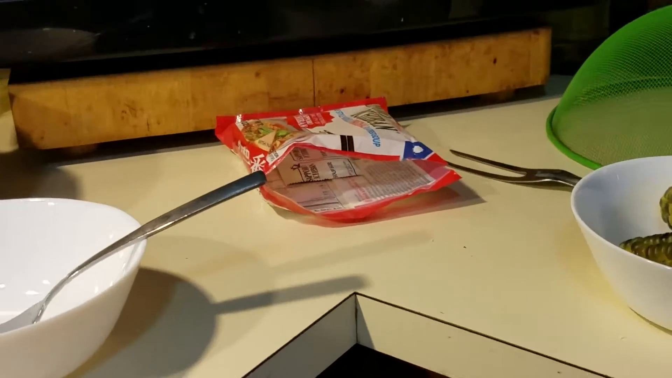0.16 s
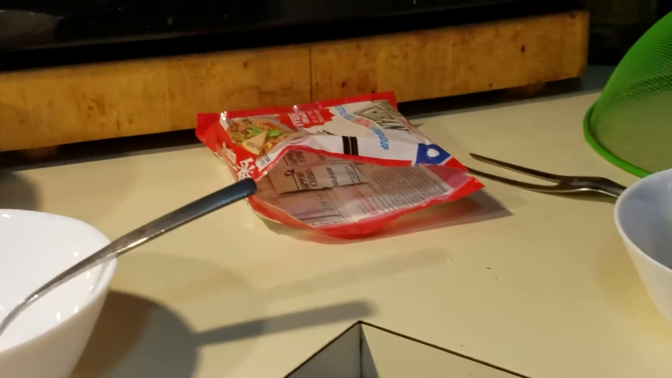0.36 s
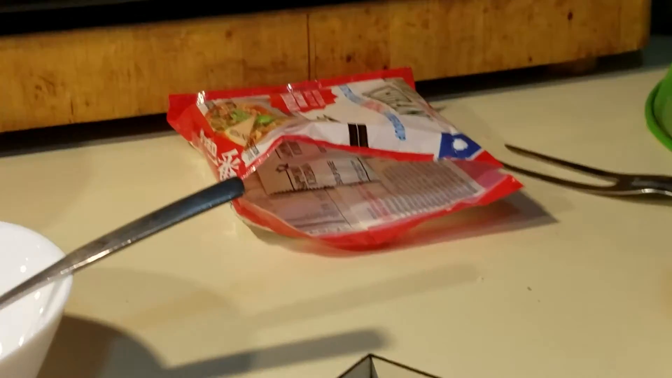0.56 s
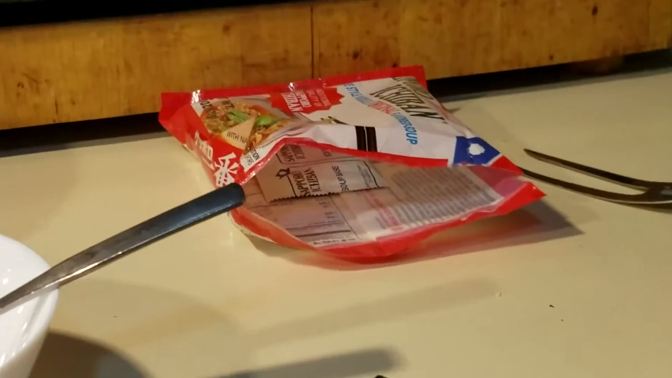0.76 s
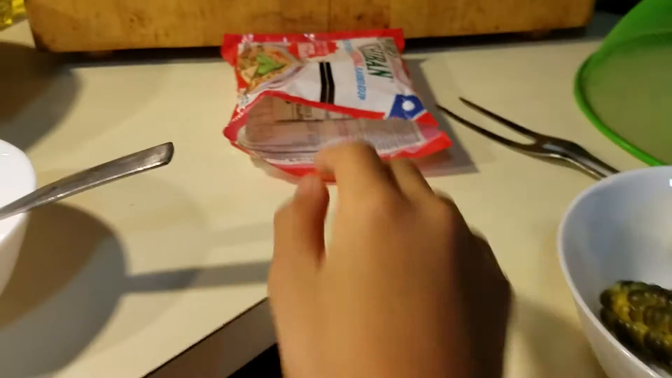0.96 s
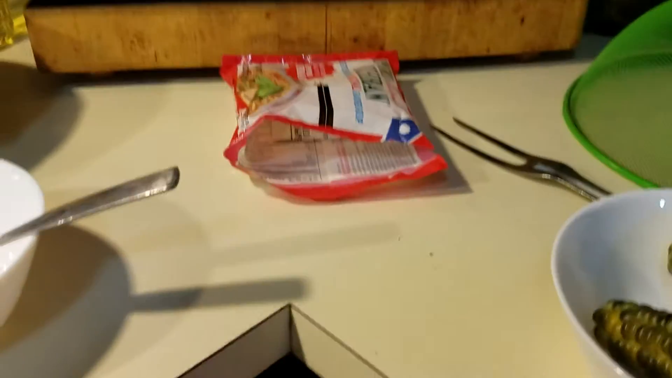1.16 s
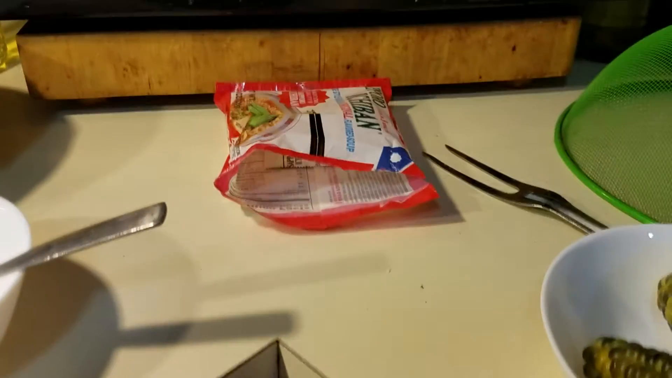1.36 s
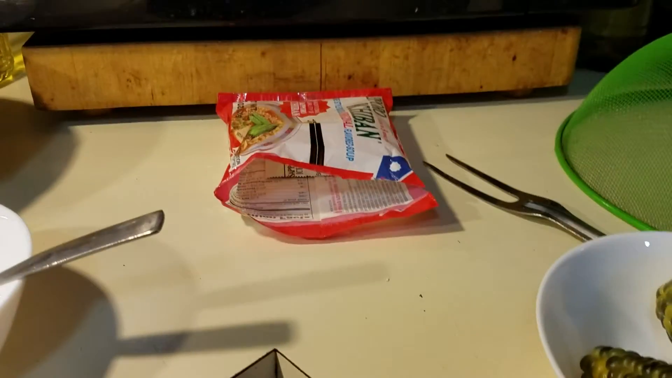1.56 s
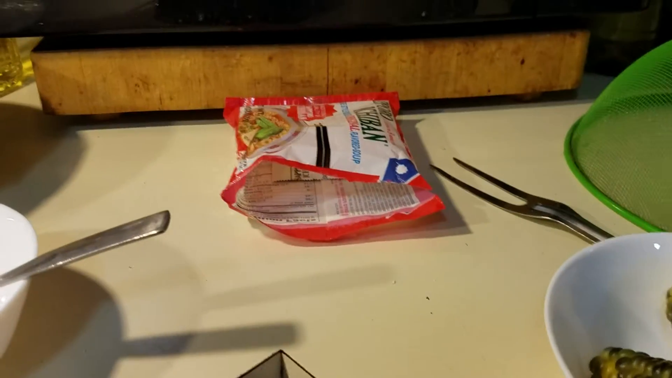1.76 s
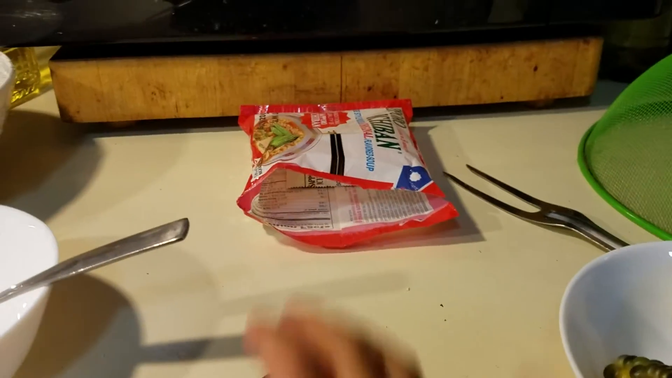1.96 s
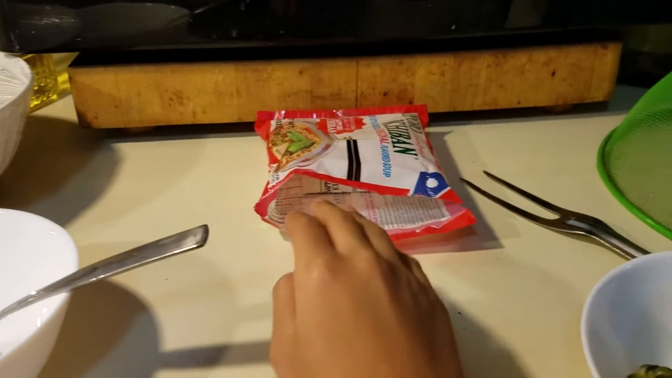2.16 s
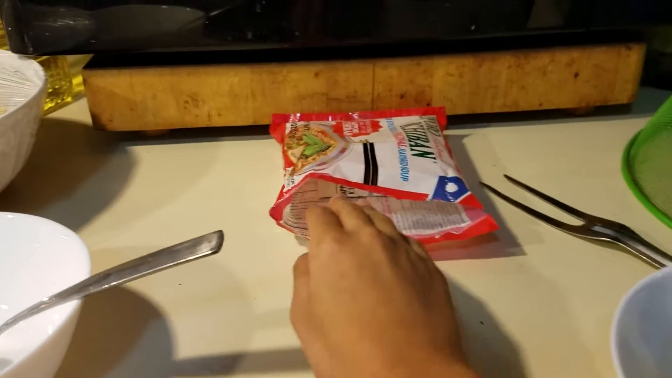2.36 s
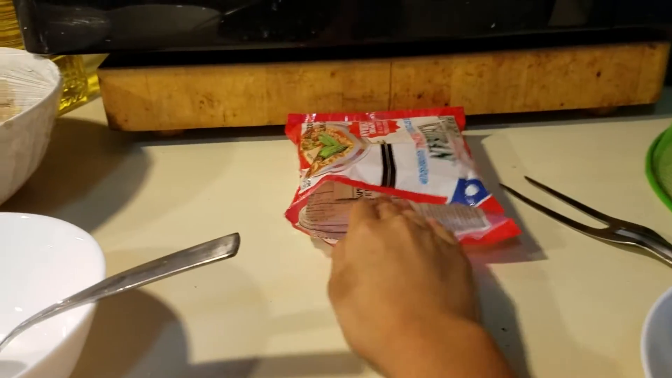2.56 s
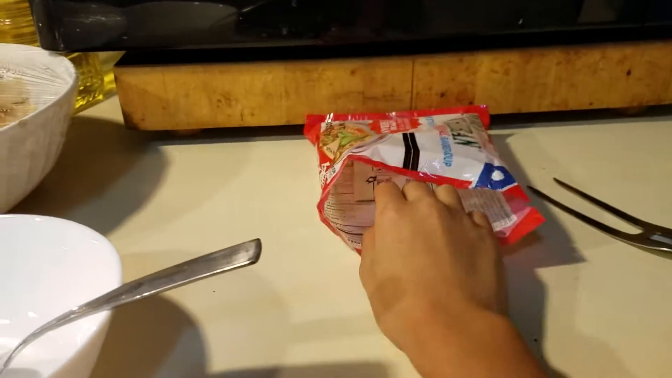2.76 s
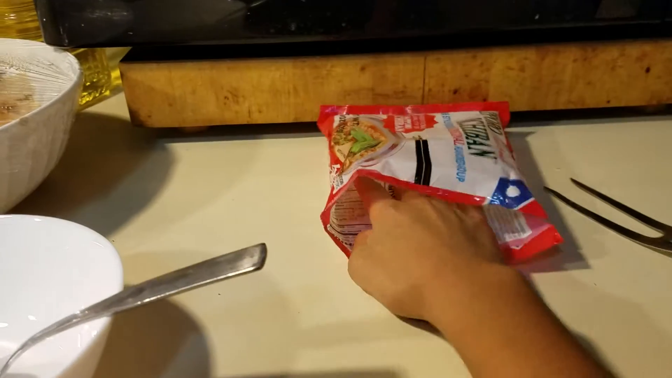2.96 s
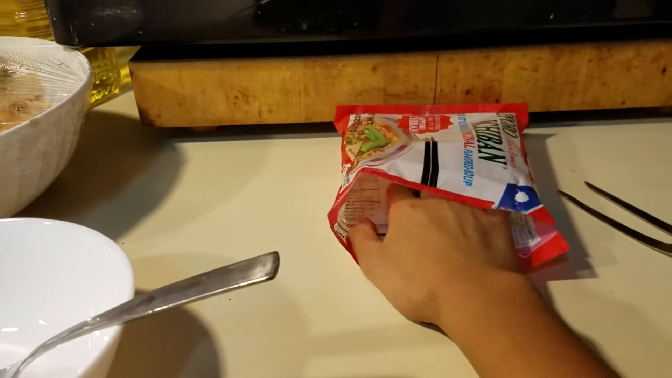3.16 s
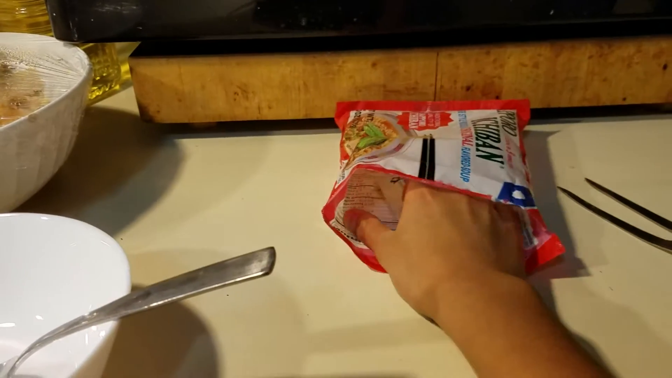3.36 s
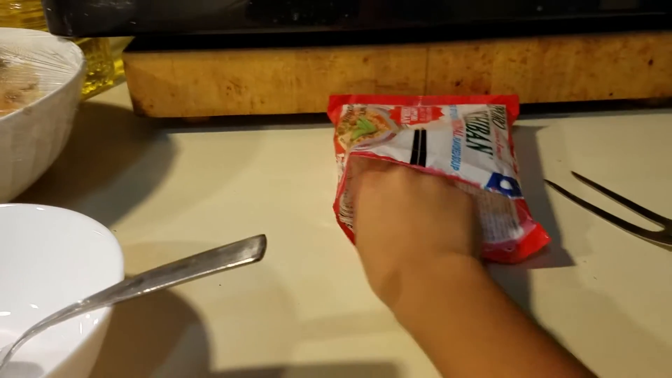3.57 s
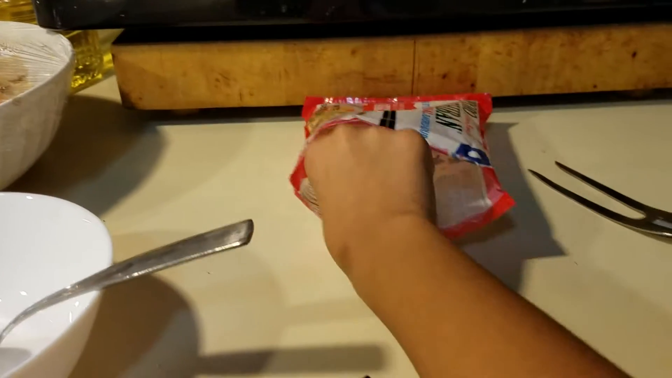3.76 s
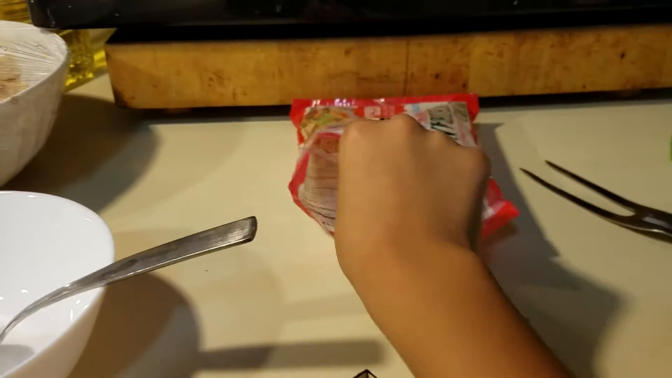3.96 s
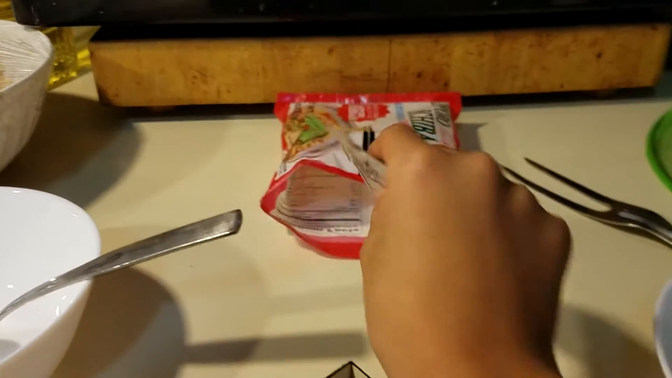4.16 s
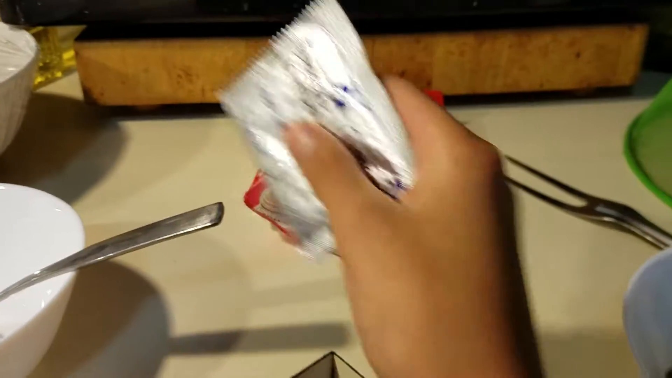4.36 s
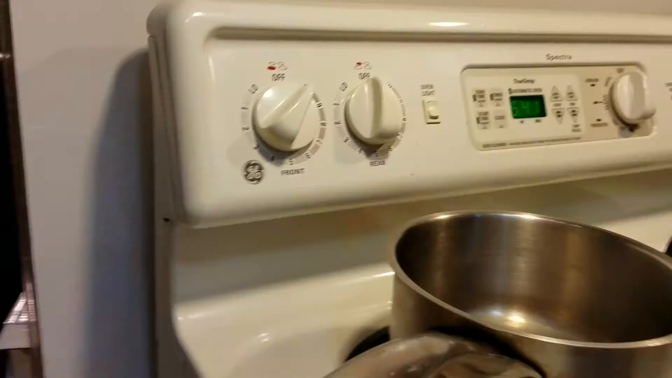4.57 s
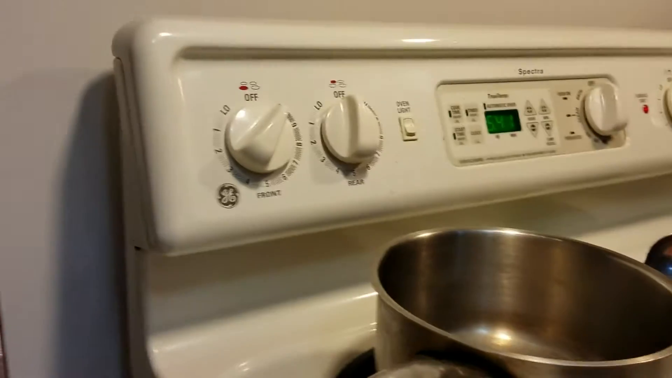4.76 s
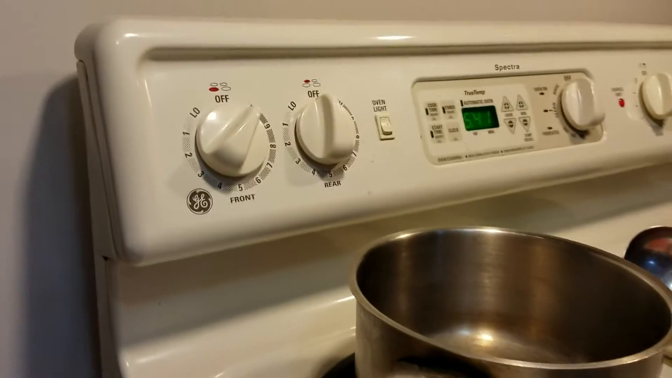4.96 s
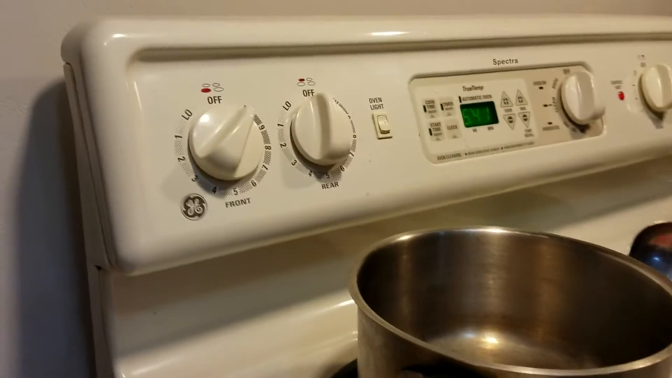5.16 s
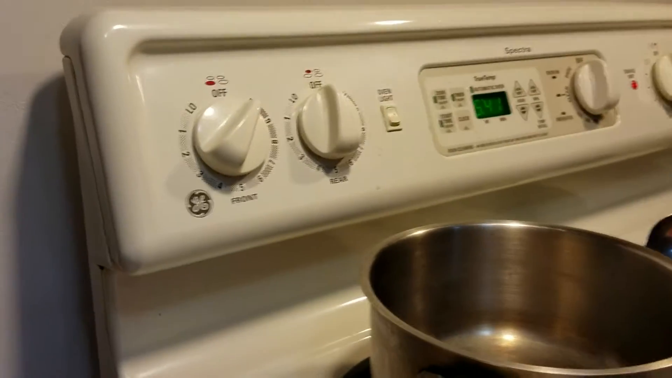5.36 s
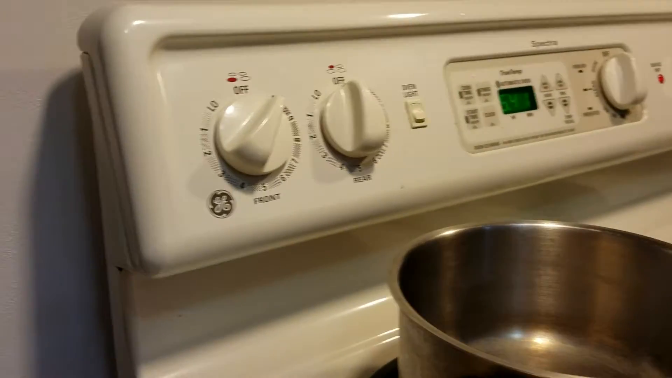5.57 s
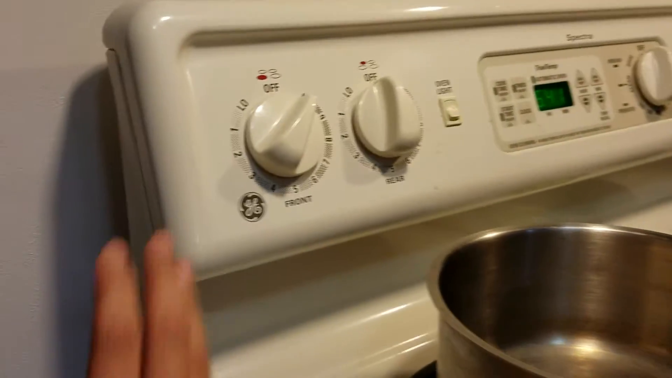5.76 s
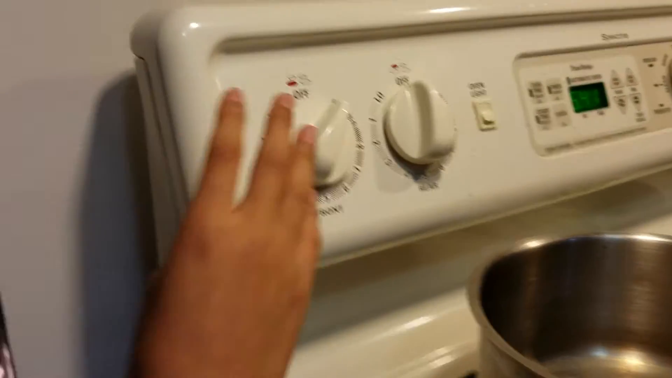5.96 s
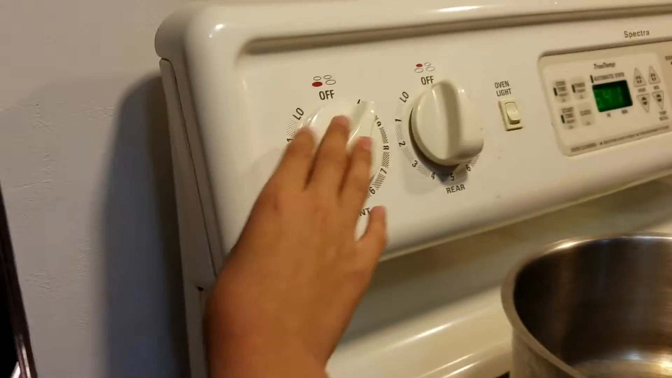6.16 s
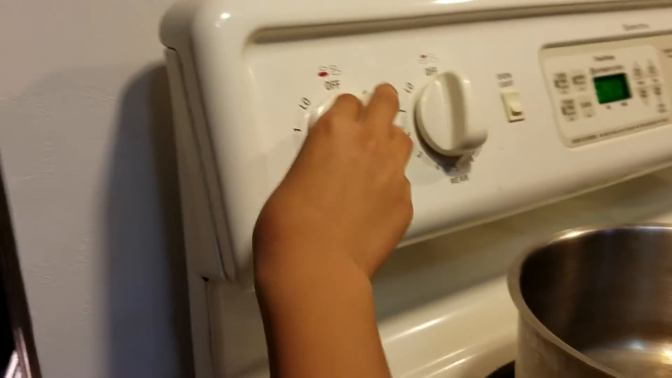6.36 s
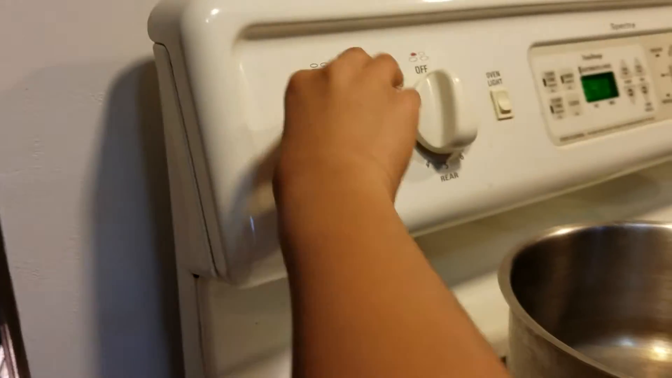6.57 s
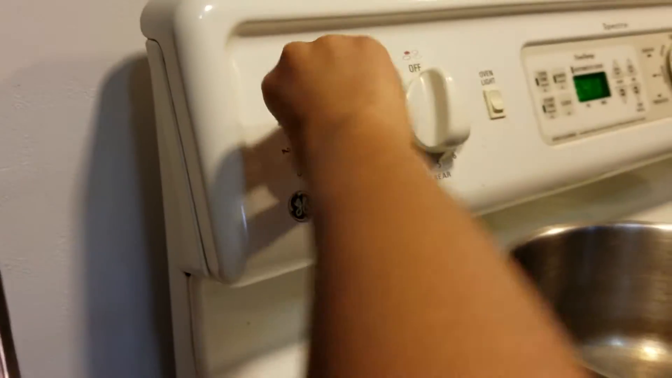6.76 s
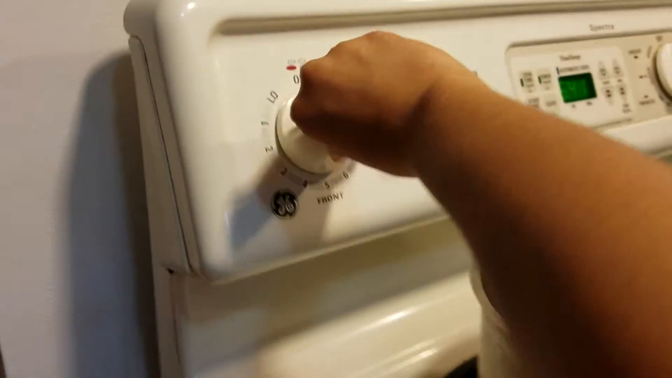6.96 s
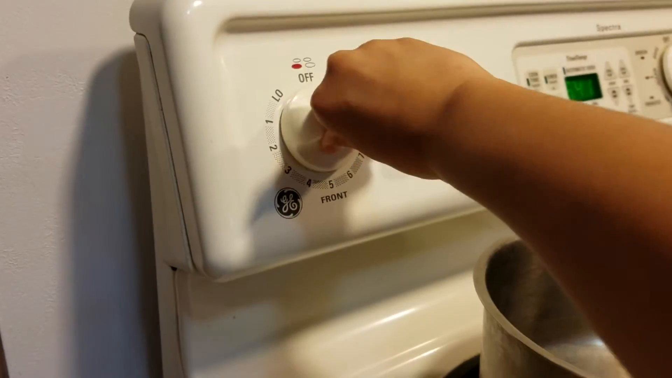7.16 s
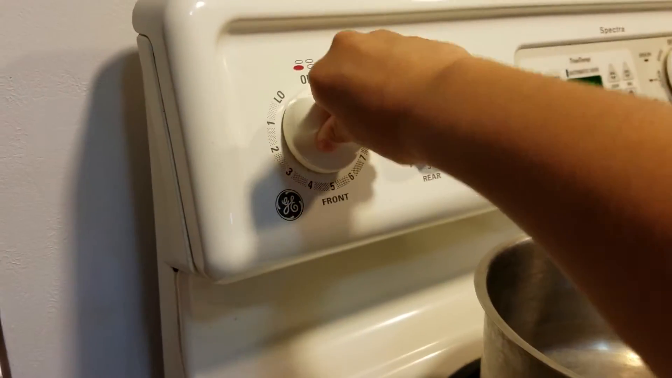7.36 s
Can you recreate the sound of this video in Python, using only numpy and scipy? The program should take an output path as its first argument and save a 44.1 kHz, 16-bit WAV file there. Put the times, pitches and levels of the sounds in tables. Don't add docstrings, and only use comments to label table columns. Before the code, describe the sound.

In a home kitchen, a pot simmers softly off to one side. A hand pushes into a foil noodle packet close to the handheld stereo microphone, making dense crinkles and sharp snaps, then a small sachet flicks faintly. The sound cuts to a close, brighter hiss with ticks, bubbles and spits, and a hollow plastic stove knob clicks and rubs round.

```python
import sys
import numpy as np
from scipy import signal
from scipy.fft import rfft, irfft
from scipy.io import wavfile
from scipy.ndimage import uniform_filter1d

SR = 44100
rng = np.random.default_rng(int(sys.argv[2]) if len(sys.argv) > 2 else 0)


def unload_audio(sound):
    columns = np.transpose(np.atleast_2d(sound))
    steps = np.round(np.clip(columns, -1, 1) * 32767)
    wavfile.write(sys.argv[1], SR, steps.astype(np.int16))


def level_to_linear(level):
    exponent = np.asarray(level, float) / 20
    return 10 ** exponent


N = 326945
T = np.arange(N) / SR
SCENE_CHANGE_S = 5.2145
TOP_HZ = 15820

# start_s, block_pressure_db, crispness_db
RUSTLE = [(2.38, -77, 2), (2.46, -61.5, 2.5), (2.63, -63.5, -21), (2.9, -51.5, -1), (3.04, -57.5, 1),
          (3.45, -55.5, 1.2), (4.02, -60.5, -3), (4.11, -66, -22), (4.399, -95, -5)]
# middle_s, length_s, block_db, foil_db, fine_crease_db
CRUNCHES = [(2.4736, 0.0054, -41, -55, -45), (3.306, 0.0041, -48, -53, -54), (4.263, 0.093, -73, -64, -58),
            (2.49, 0.053, -48, -50, -56), (2.763, 0.079, -51, -48.5, -45.5),
            (2.871, 0.028, -43.5, -46, -39), (2.894, 0.026, -43.5, -48, -40.5),
            (2.941, 0.024, -51, -59, -45), (2.989, 0.014, -44, -59, -45), (3.058, 0.041, -55, -51, -46.5),
            (3.169, 0.021, -63, -55, -41.5), (3.39, 0.06, -47, -50, -42.5), (3.537, 0.016, -52, -38.5, -44),
            (3.574, 0.023, -39, -39, -40), (3.61, 0.19, -48, -48.5, -43.5), (3.774, 0.015, -66, -46, -52.5),
            (3.827, 0.017, -41, -45, -51), (3.951, 0.035, -47, -62, -63), (3.906, .025, -53.5, -63, -72),
            (4.01, .012, -62, -64, -66), (4.2, 0.13, -71, -64, -55.5), (4.302, 0.13, -64, -65.5, -61.5)]
# pitch_hz, level_db (per Hz)
FOIL_COLOUR = [(35, -41), (60, -18), (188, -9.5), (476, -6.5), (522, -5), (794, -9.5), (1360, 0.5),
               (1520, -3.5), (1750, -1.5), (3360, 2), (7240, -3.5), (13300, -2), (15600, -4)]
# start_s, foil_peak_db, fine_crease_db, panel_pitch_hz
SNAPS = [(2.4288, -46, -43, 1300), (2.5847, -37, -21.5, 1390), (2.6586, -53, -34, 1150),
         (2.7167, -44, -45, 1180), (2.7372, -32, -20.5, 3040), (2.813, -43.5, -31.5, 1450),
         (2.9719, -42, -24.5, 1370), (2.9757, -36.5, -25, 4800), (2.9856, -33, -28, 4840),
         (3.0195, -34.5, -23.5, 5680), (3.0793, -43, -33, 2530), (3.0907, -35, -19.5, 1730),
         (3.1268, -55, -23, 4700), (3.1337, -42, -25.5, 6610), (3.183, -44, -40, 4670),
         (3.1934, -44, -25, 5760), (3.2565, -35.5, -23.5, 4600), (3.3122, -28, -16.5, 3450),
         (3.455, -32, -17.5, 3000), (3.5019, -30, -18, 3060), (3.5576, -22, -17, 1900),
         (3.6316, -36, -40, 2490), (3.6414, -35, -42, 2330), (3.6583, -40, -54, 3250),
         (3.7264, -44, -50, 1860), (3.8202, -41.5, -35, 2000), (3.9457, -38.5, -30.5, 1660),
         (3.9799, -41.5, -45, 2650), (4.0321, -40.5, -30, 2650), (4.1944, -54, -57, 2980)]
# start_s, foil_peak_db, fine_crease_db, panel_pitch_hz
SACHET_FLICKS = [
    (4.475, -50, -64, 3000),
    (4.4864, -57, -60, 1840),
    (4.4944, -59, -66, 3200),
    (4.5154, -53, -62, 3140),
]
# start_s, body_peak_db, fine_peak_db, shell_pitch_hz
KNOB_KNOCKS = [
    (6.404, -43.5, -45, 2440),
    (6.9145, -37, -37, 2440),
    (6.9197, -44, -32, 1210),
]
# start_s, body_peak_db, fine_peak_db, pitch_hz
SPITS = [
    (0.9283, -51.5, -56, 3490),
    (5.5544, -58, -40.5, 1240),
    (5.8745, -37, -24, 4500),
    (5.9868, -46.5, -57, 2450),
    (6.5894, -55, -61, 1120),
    (6.7044, -58, -42, 2540),
    (7.3394, -58, -59, 2900),
]
# start_s, peak_db, pitch_hz
PLOPS = [(1.486, -46, 94), (1.566, -42, 157), (2.479, -32, 185), (2.893, -30, 306), (2.989, -38, 187),
         (3.74, -48.5, 132), (4.04, -53, 87), (5.063, -45, 156), (5.109, -53, 76.4), (5.105, -47, 147),
         (5.481, -37.5, 250), (5.549, -54, 536), (5.991, -50, 255), (6.221, -39, 526), (6.435, -34, 260),
         (6.499, -42, 557), (6.586, -49, 129)]
# start_s, facing_pot_db
FAR_TURN = [(0.0, -1), (0.9, -1), (1.45, -1.3), (1.8, -3), (2.25, -2), (2.38, -1.5), (4.36, -1.3),
            (4.55, -3), (4.8, -1), (4.93, -2.5), (5.1, -0.8), (5.2, -2.5)]
# start_s, facing_pot_db
NEAR_TURN = [(5.23, 3), (5.28, -0.2), (6.06, -0.05), (6.8, -2.5), (7.05, -3), (7.3, -6)]
# pitch_hz, level_db (per Hz)
FAR_COLOUR = [(15, -50), (25, -14), (33, -23), (148, -5), (216, -8.5), (298, -7), (434, -10), (633, -11),
              (744, -10), (1080, -10.5), (1420, -7), (2640, -12.5), (4280, -17), (8400, -16),
              (15600, -17.5)]
# pitch_hz, level_db (per Hz)
NEAR_COLOUR = [(15, -56), (25, -27), (86, -7.5), (199, -5.5), (253, -3.5), (390, -7), (584, -4),
               (898, -11.5), (1270, -4.5), (1910, -9), (2430, -5.5), (3740, -15), (6080, -13.5),
               (10700, -7.5), (15600, -7.5)]
# pitch_hz, level_db
FAR_SHEEN = [(3300, 10.5), (3800, 4.5), (4600, 1.5), (6400, -5.5), (8400, -1), (9900, -4), (11500, -2.1),
             (15000, -2)]
# pitch_hz, level_db
NEAR_SHEEN = [(3300, 3), (3750, 5), (4600, 6.5), (6200, -2.5), (8000, 1), (9400, -5), (11000, 0),
              (12200, -4), (14000, -0.5)]
# pitch_hz, width_hz, level_db
POT = [(646, 74, 3), (1084, 50, 5), (1840, 120, -1)]
# start_s, pitch_hz, level_db
VENT = [
    [(0.0, 2600, -58), (0.2, 2595, -54.5), (0.73, 2800, -66), (1.42, 2800, -65), (1.82, 2640, -78),
     (2.38, 2630, -61), (4.3, 2780, -63), (4.53, 2900, -81), (4.9, 2600, -65), (5.2, 2690, -70)],
    [(5.23, 2880, -53), (5.62, 2760, -58), (5.84, 2840, -57.5), (6.18, 2552, -54), (6.43, 2490, -57),
     (6.7, 2590, -58), (7.01, 2550, -55), (7.35, 2790, -61)],
]
# start_s, pitch_hz, level_db
DRONE = [(1.5, 151, -92), (1.7, 151.5, -66.5), (2.08, 150, -70), (2.2, 151, -90)]
# pitch_hz, left_minus_right_db
PORT_BALANCE = [(60, 7), (110, 2), (200, 1), (380, 1.5), (700, 1), (1290, -3.5), (2380, 3), (4400, 0.5),
                (8120, -2), (15000, 1)]
# pitch_hz, shared_part (0-1)
LIKENESS = [(60, .75), (300, .87), (800, .68), (2500, .5), (6000, .3), (9000, .17), (15000, .12)]

FAR_LAYERS_DB, FAR_SHARE = (-62.5, -65, -67, -65), (0.64, 1.9, 0.81, 1.22)
NEAR_LAYERS_DB, NEAR_SHARE = (-59, -64, -64, -56), (0.18, 0.2, 0.37, 0.94)
# middle_s, length_s, then level_db in each layer
KNOB_RUB = (7.02, .2, -62, -61, -58, -66)


def rustle():
    lag = 7
    creases = 0
    for band, per_s in enumerate((300, 400, 600, 900)):
        creases = creases + split(spatter(per_s, 2.8, .012, lag))[band]
    clumps = creases * level_to_linear(2.0 * walk(80))
    scrape = spread(lag, N) * level_to_linear(2.0)
    foil = filtered(clumps + scrape, lambda hz: level_to_linear(on_log(FOIL_COLOUR, hz)))
    fade = np.interp(T, [2.37, 2.4, 4.36, 4.42], [0, 1, 1, 0])
    return fade * played(foil, *hand())


def hand():
    s, db, crisp_db = np.transpose(RUSTLE)
    counter_db = db - 1.5
    steady = np.c_[s, counter_db, db, db + 1.35 * crisp_db, db + 0.46 * crisp_db]
    slow_fold_s, db_per_octave = 0.074, 4.5
    folds = []
    for mid, length, block_db, *foil_db in CRUNCHES:
        pressed_db = db_per_octave * min(np.log2(length / slow_fold_s), 0)
        folds.append((mid, length, block_db + pressed_db, block_db, *foil_db))
    return steady, folds


def foil_snaps():
    pan_db = lambda s: 2.5 + 1.8 * (s - 2.4)
    return snaps(SNAPS, 6, [0.033, 0.043, 0.033, 0.034], counter_db=-8.5, crack_t60=.005, flutter_db=-9,
                 ring_db=13.0, width=0.1, under_db=-6.5, pan=pan_db)


def sachet_flicks():
    return snaps(SACHET_FLICKS, 5.5, [.02, 0.018, 0.013, .015], counter_db=-22, crack_t60=.006,
                 flutter_db=-2.5, ring_db=14.0, width=0.063, under_db=-3, pan=lambda s: 5.5)


def knob_knocks():
    return snaps(KNOB_KNOCKS, 16, [0.087, 0.061, 0.045, 0.066], counter_db=2.1, crack_t60=0.013,
                 flutter_db=-2, ring_db=17, width=.09, under_db=-5.0, pan=lambda s: -1.5)


def spits():
    return snaps(SPITS, 15, [0.026, .03, 0.015, 0.012], counter_db=1.6, crack_t60=.005, flutter_db=-7,
                 ring_db=2.2, width=0.097, under_db=-4, pan=lambda s: 1.5)


def snaps(table, lag, t60s, counter_db, crack_t60, flutter_db, ring_db, width, under_db, pan):
    out, t = np.zeros((2, N + 4096)), np.arange(-256, 3840) / SR
    decay = lambda t60: (t >= 0) * level_to_linear(-60 * t / t60)
    for s, foil_db, fine_db, panel_hz in table:
        block_db = foil_db + under_db - 8.5 * np.log2(panel_hz / 2400)
        panel = lambda hz: 1 + level_to_linear(ring_db) / (1 + ((hz - panel_hz) / (width * panel_hz)) ** 2)
        crack = split(spread(lag, len(t)) * decay(crack_t60))
        ragged = level_to_linear(4.7 * np.repeat(rng.standard_normal(64), 64))
        flutter = split(filtered(spread(lag, len(t)), panel) * ragged)
        peaks_db = [block_db + counter_db, block_db, foil_db, fine_db]
        hit = 0
        for c, f, t60, peak_db in zip(crack, flutter, t60s, peaks_db):
            band = c + level_to_linear(flutter_db) * f * decay(t60)
            hit = hit + band / abs(band.mean(0)).max() * level_to_linear(peak_db)
        at, pan_db = int(s * SR) - 256, pan(s)
        out[:, at:at + len(t)] += hit * level_to_linear(np.array([[pan_db], [-pan_db]]) / 2)
    bass = lambda hz: 1 / (1 + (200 / (hz + 1)) ** 3)
    treble = lambda hz: 1 / np.sqrt(1 + (hz / 11300) ** 2)
    return room(filtered(out[:, :N], lambda hz: bass(hz) * treble(hz)), -7.5, 0.25)


def plops(cycles=7.4, glide=0.087):
    out = np.zeros(N)
    for s, db, hz in PLOPS:
        turns = hz * np.maximum(T - s, 0)
        swell = np.minimum(turns / 2.2, 1) * np.exp(-4 * turns / cycles)
        rise = 1 + glide * np.minimum(turns / cycles, 1)
        out += level_to_linear(db) * swell * np.sin(2 * np.pi * turns * rise)
    return out


def simmer(colour, sheen, table, lag, ticks_per_s, tick_db, bubbles_db, pot_db, bursts=()):
    def tick(mid_hz):
        puffs = spatter(ticks_per_s, 2.5, 0.0084, lag)
        return filtered(puffs, lambda hz: 1 / (1 + ((hz - mid_hz) / 2500) ** 4))

    ticks = .6 * tick(7500) + tick(11000) + tick(14000)
    bubbles = filtered(spatter(50, 4.0, 0.061, lag), lambda hz: 1 / (1 + (hz / 900) ** 4))
    hiss = spread(lag, N) * level_to_linear(0.5 * walk(13))
    sound = hiss + level_to_linear(tick_db) * ticks + level_to_linear(bubbles_db) * bubbles
    pot = lambda hz: 1 + sum(level_to_linear(db + pot_db) / (1 + (2 * (hz - f) / w) ** 2) for f, w, db in POT)
    tone = lambda hz: level_to_linear(on_log(colour, hz) + on_log(sheen, hz)) * pot(hz)
    return played(filtered(sound, tone), table, bursts)


def facing(table, layers_db, share):
    s, turn_db = np.transpose(table)
    return np.c_[s, np.array(layers_db) + np.outer(turn_db, share)]


def far_pot():
    turn = facing(FAR_TURN, FAR_LAYERS_DB, FAR_SHARE)
    sound = simmer(FAR_COLOUR, FAR_SHEEN, turn, -15.5, 60, tick_db=-9, bubbles_db=-4.0, pot_db=0.48)
    return sound + whistle(VENT[0], 640, -6.0, -13.5)


def near_pot():
    turn = facing(NEAR_TURN, NEAR_LAYERS_DB, NEAR_SHARE)
    sound = simmer(NEAR_COLOUR, NEAR_SHEEN, turn, 16, 120, tick_db=-2.0, bubbles_db=-3.5, pot_db=-13.0,
                   bursts=[KNOB_RUB])
    return sound + whistle(VENT[1], 840, -5.5, 13.8)


def whistle(table, width_hz, trim_db, lag):
    s, hz, db = np.transpose(table)
    slow = filtered(rng.standard_normal((2, N)), lambda f: 1 / (1 + (2 * f / width_hz) ** 4))
    turn = 2 * np.pi * np.cumsum(np.interp(T, s, hz)) / SR
    tone = np.sum(slow / slow.std() * [np.cos(turn), np.sin(turn)], axis=0)
    x = tone * level_to_linear(np.interp(T, s, db) + trim_db)
    return np.array([np.roll(x, lag), x])


def drone():
    return whistle(DRONE, 24, 0.1, 0)


def room(x, wet_db, t60):
    t = np.arange(SR // 2) / SR
    tail = level_to_linear(wet_db - 60 * t / t60) / np.sqrt(t60 * SR / 14)
    echo = tail * spread(0, len(t)) * np.minimum(t / 0.011, 1)
    return x + signal.fftconvolve(x, echo, axes=1)[:, :N]


def spread(lag, size):
    shared, *own = rng.standard_normal((3, size))
    like = lambda hz: np.clip(on_log(LIKENESS, hz), 0, 1)
    both = filtered(np.array([np.roll(shared, lag), shared]), lambda hz: np.sqrt(like(hz)))
    return both + filtered(np.array(own), lambda hz: np.sqrt(1 - like(hz)))


def spatter(per_s, spread_db, t60, lag):
    puffs = signal.lfilter([1], [1, -level_to_linear(-60 / t60 / SR)], clicks(per_s, spread_db))
    x = spread(lag, N) * puffs
    return x / x.std()


def clicks(per_s, spread_db):
    hit, size = rng.random((2, N))
    return (hit < per_s / SR) * level_to_linear(np.minimum(-spread_db * np.log(size + 1e-9), 11))


def walk(rate):
    k = int(SR / rate)
    held = np.repeat(rng.standard_normal(N // k + 1), k)
    return uniform_filter1d(uniform_filter1d(held, k), k)[:N]


def played(x, table, bursts=()):
    s, *db = np.transpose(table)
    gain = np.array([level_to_linear(np.interp(T, s, d)) for d in db])
    for mid, length, *burst_db in bursts:
        swell = np.exp(-2 * ((T - mid) / (length / 2)) ** 2)
        gain = np.hypot(gain, level_to_linear(np.array(burst_db))[:, None] * swell)
    bands = split(filtered(x, lambda hz: hz < TOP_HZ))
    return sum(b / b.mean(0).std() * g for b, g in zip(bands, gain))


def split(x, edges_hz=(800, 2000, 3900)):
    edges = np.array(edges_hz)[:, None]
    place = lambda hz: np.clip(2.5 * np.log2((hz + 1) / edges) + .5, 0, 1).sum(0)
    return [filtered(x, lambda hz: np.clip(1 - abs(place(hz) - k), 0, 1)) for k in range(len(edges_hz) + 1)]


def filtered(x, gain):
    size = x.shape[-1]
    return irfft(rfft(x) * gain(np.fft.rfftfreq(size, 1 / SR)), size)


def on_log(table, hz):
    table_hz, value = np.transpose(table)
    return np.interp(np.log(hz + 1), np.log(table_hz), value)


def scene():
    hits = level_to_linear(3) * foil_snaps() + level_to_linear(5) * sachet_flicks()
    hits = hits + level_to_linear(3.5) * knob_knocks() + level_to_linear(3.5) * spits() + plops()
    pot = np.where(T < SCENE_CHANGE_S, far_pot(), near_pot())
    return rustle() + hits + pot + drone()


def band_limit(x):
    return signal.sosfilt(signal.butter(12, 16820, fs=SR, output="sos"), x)


def record(dry):
    side = np.array([[.5], [-.5]])
    sound = filtered(dry, lambda hz: level_to_linear(side * on_log(PORT_BALANCE, hz)))
    over = filtered(sound, lambda hz: (hz > TOP_HZ) & (hz < 16900))
    loud = uniform_filter1d(abs(sound).max(0), size=128) > .04
    opening = uniform_filter1d(1. * loud, size=256)
    sound = filtered(sound, lambda hz: hz <= TOP_HZ) + level_to_linear(-20) * over * opening
    return band_limit(sound - .0005)


dry = scene()
out = record(dry)
unload_audio(out)
```